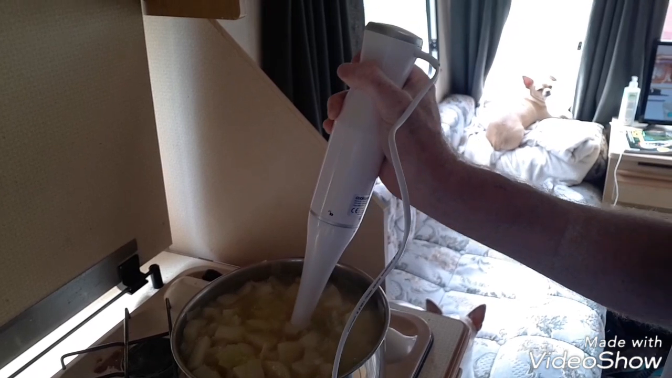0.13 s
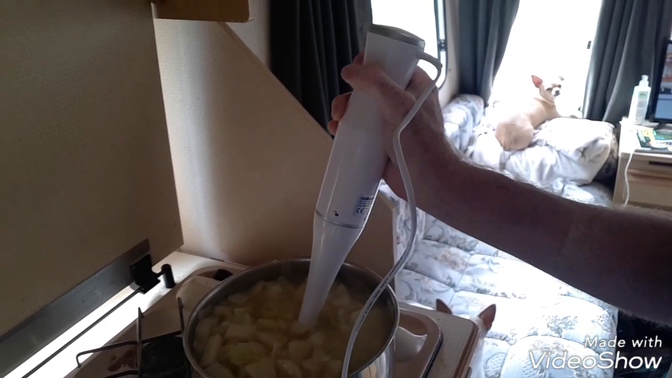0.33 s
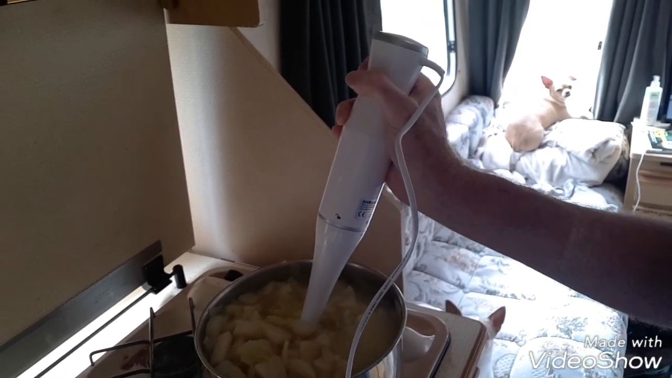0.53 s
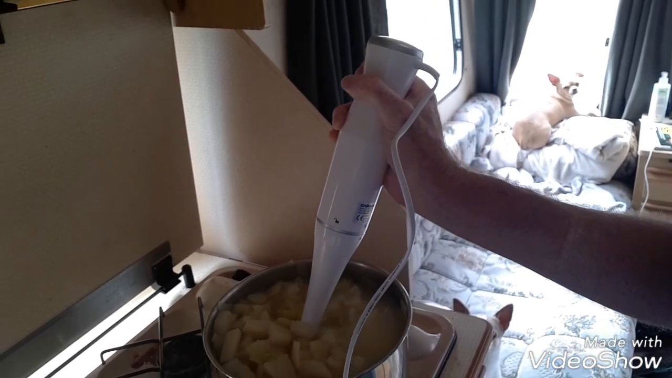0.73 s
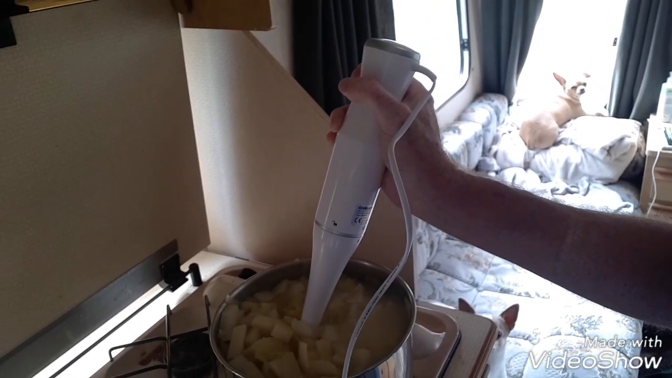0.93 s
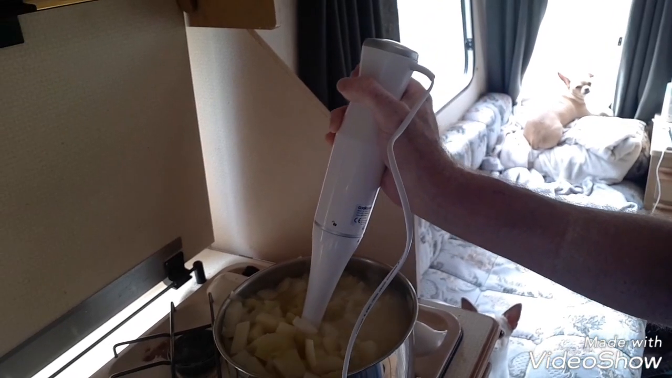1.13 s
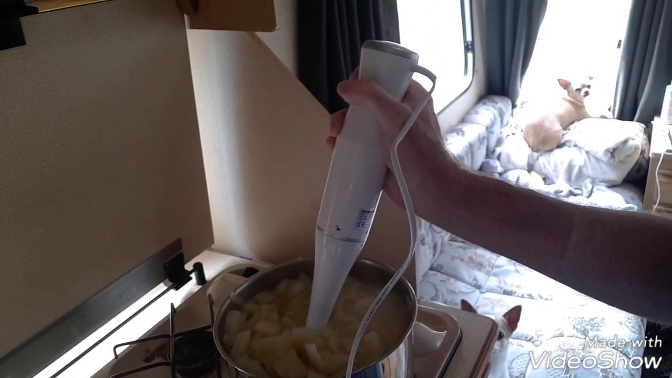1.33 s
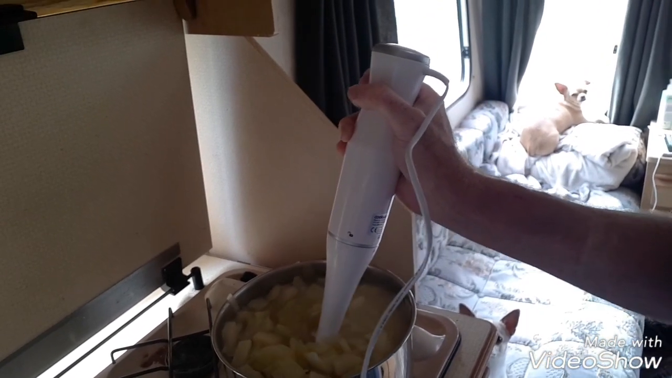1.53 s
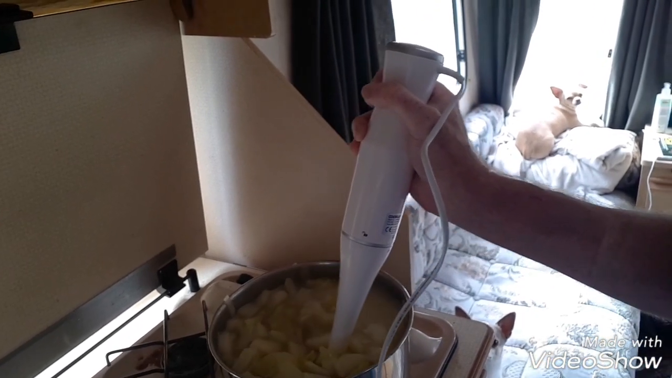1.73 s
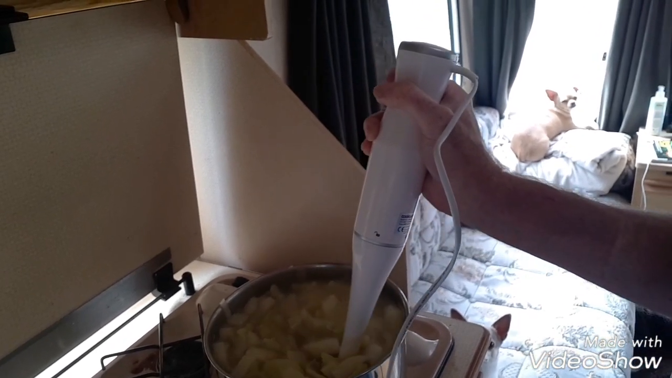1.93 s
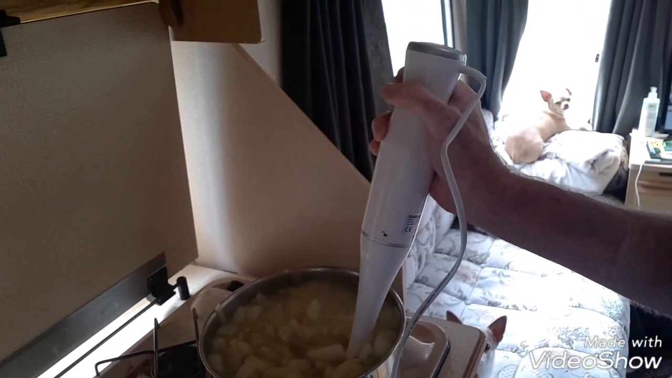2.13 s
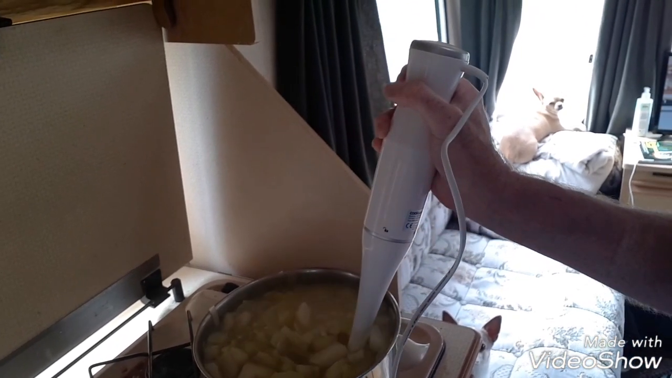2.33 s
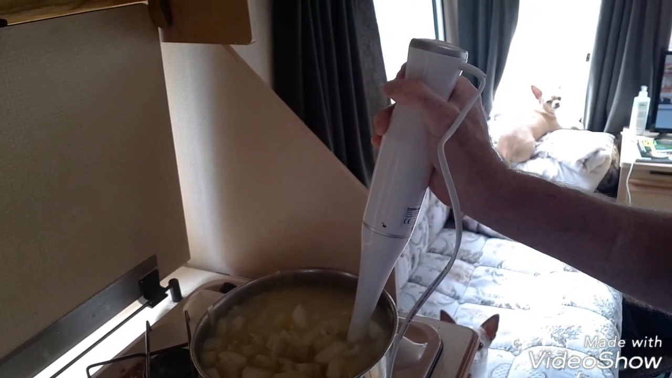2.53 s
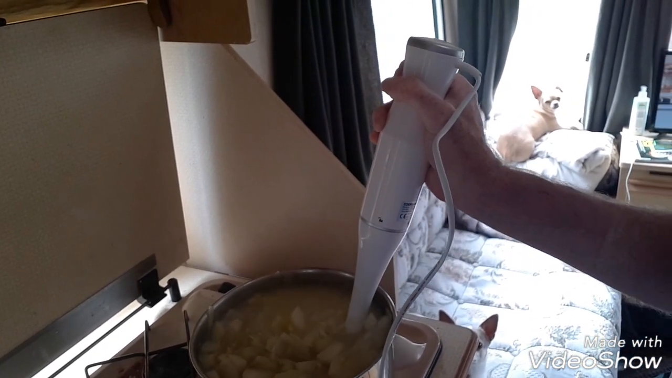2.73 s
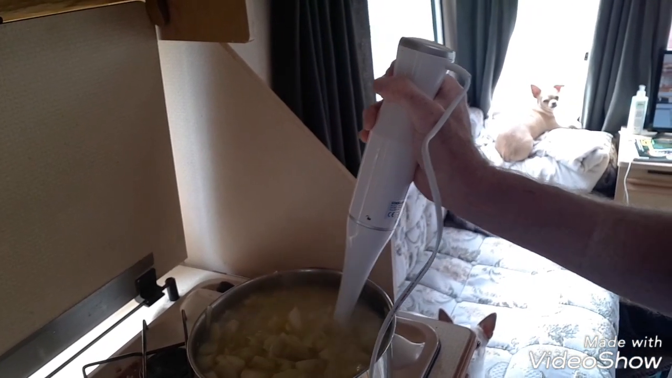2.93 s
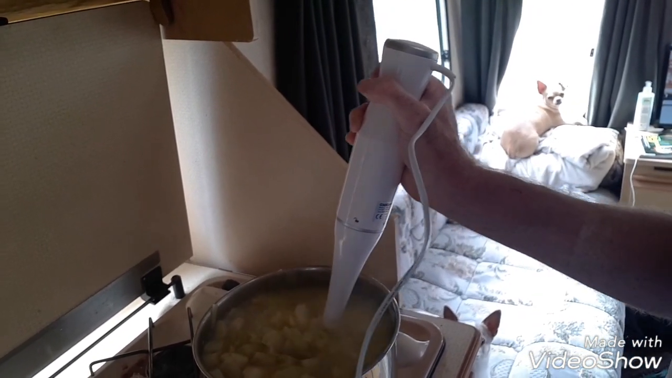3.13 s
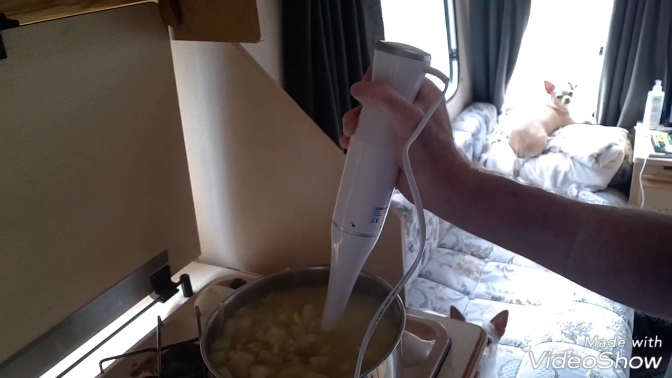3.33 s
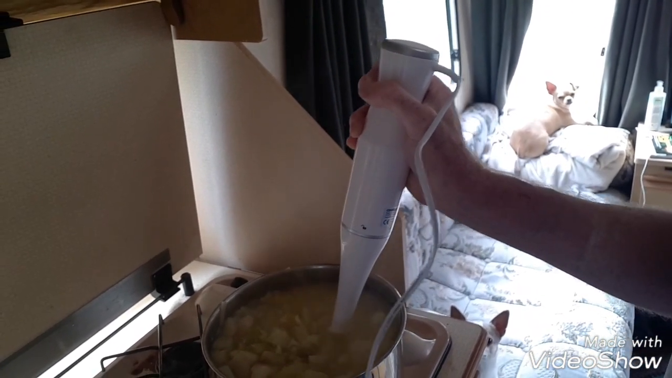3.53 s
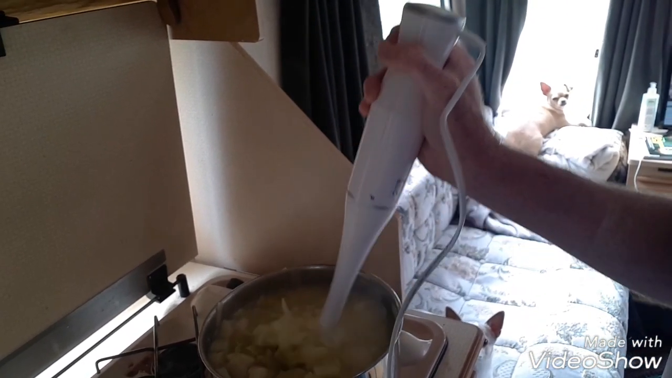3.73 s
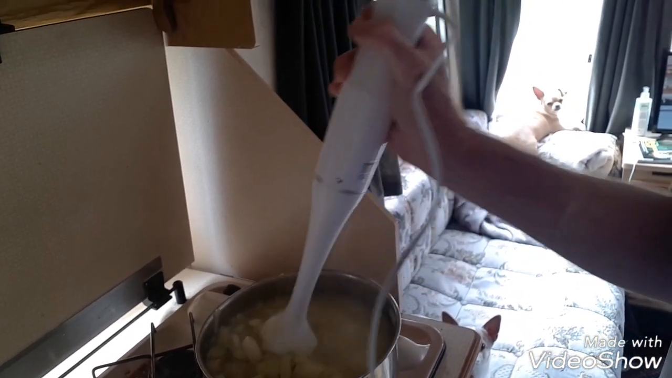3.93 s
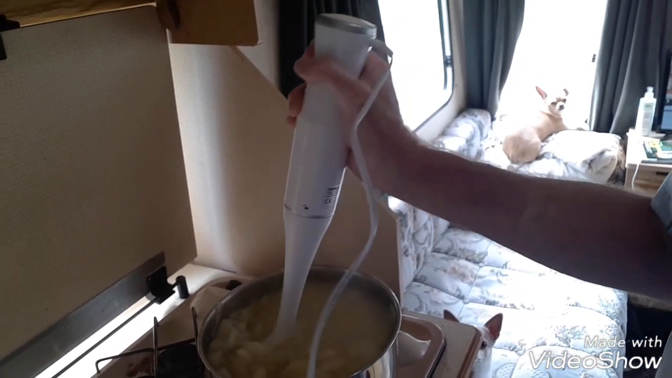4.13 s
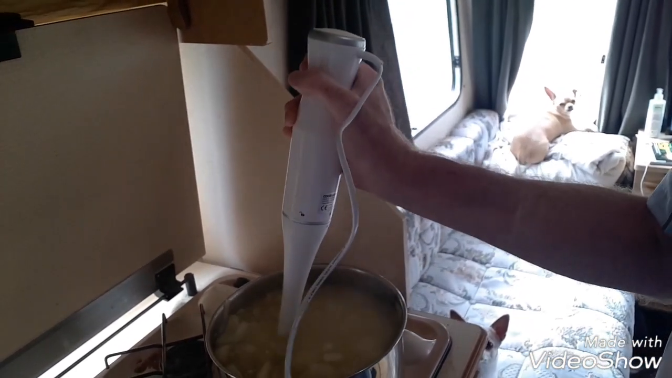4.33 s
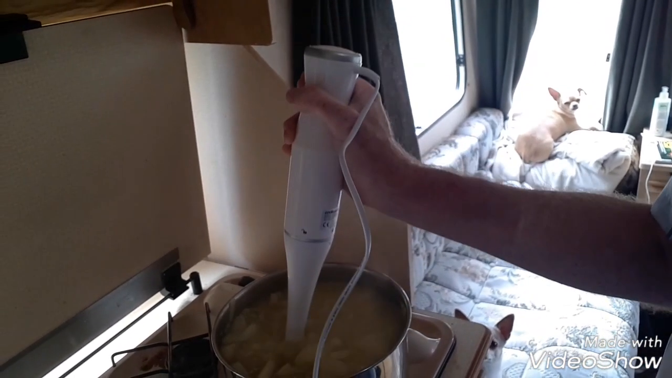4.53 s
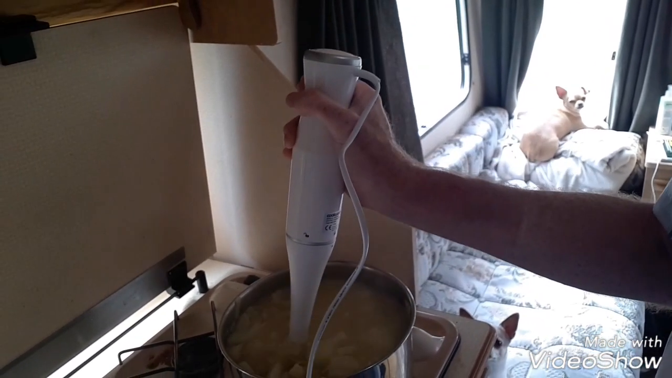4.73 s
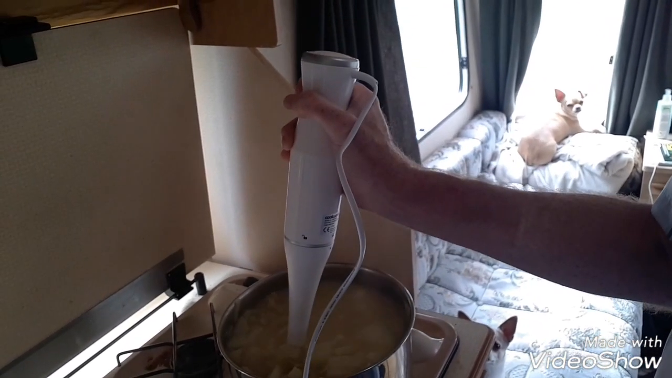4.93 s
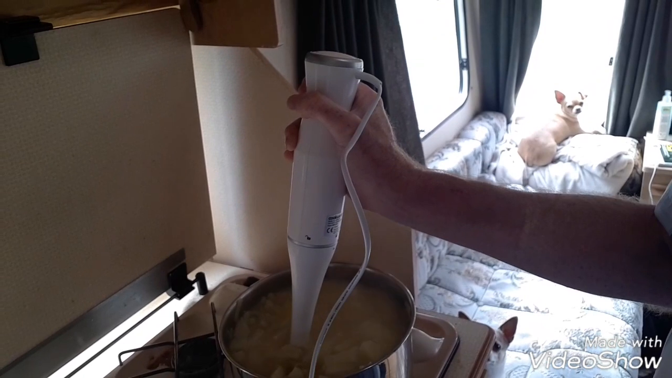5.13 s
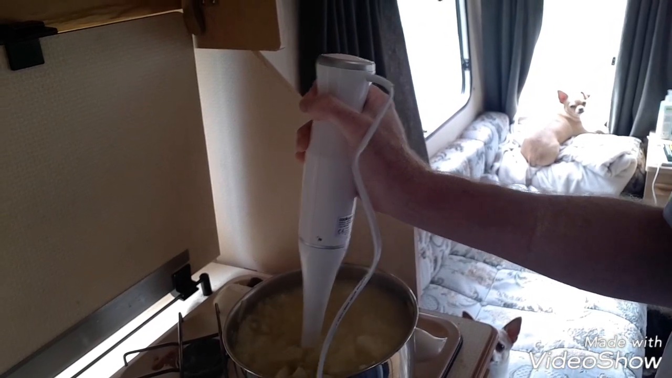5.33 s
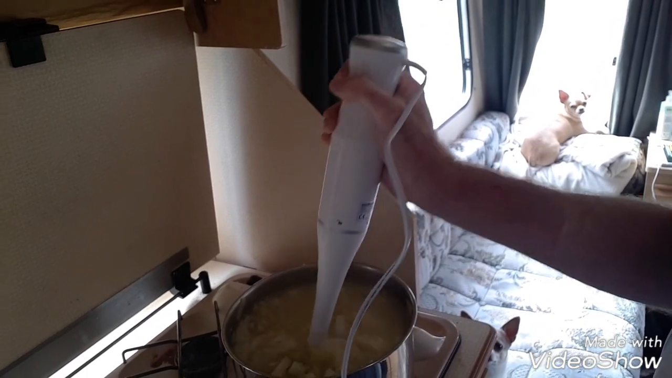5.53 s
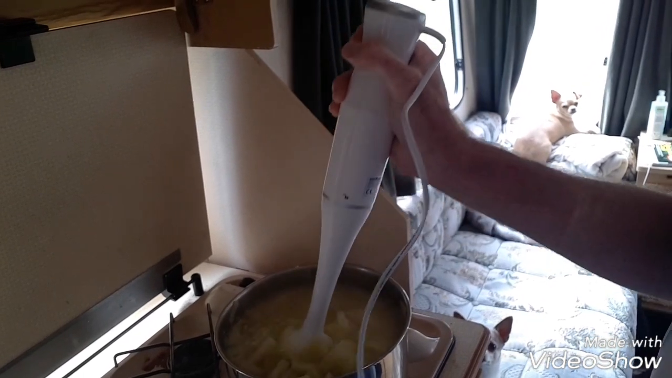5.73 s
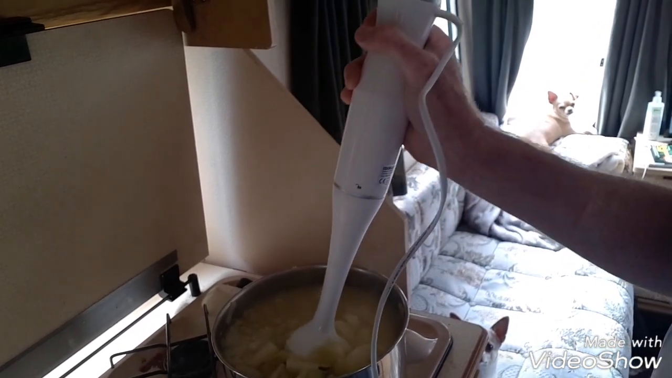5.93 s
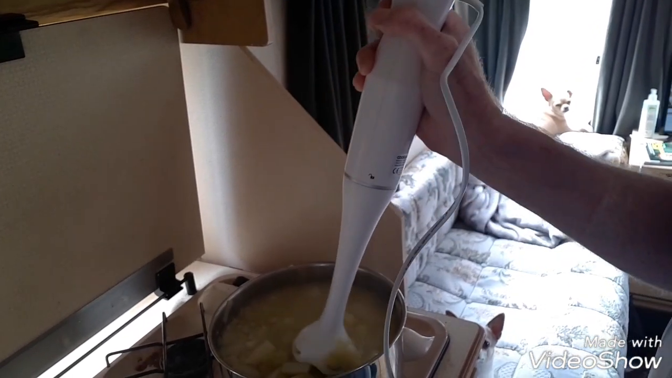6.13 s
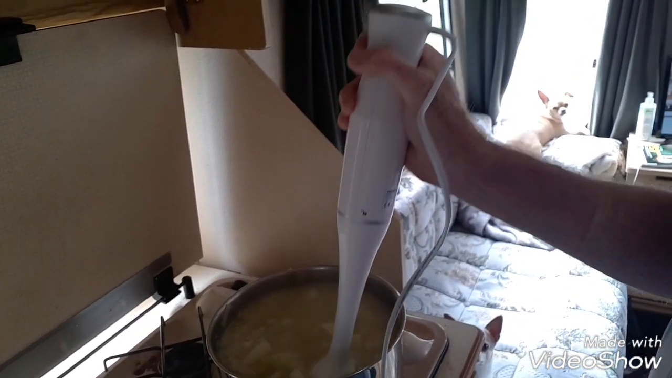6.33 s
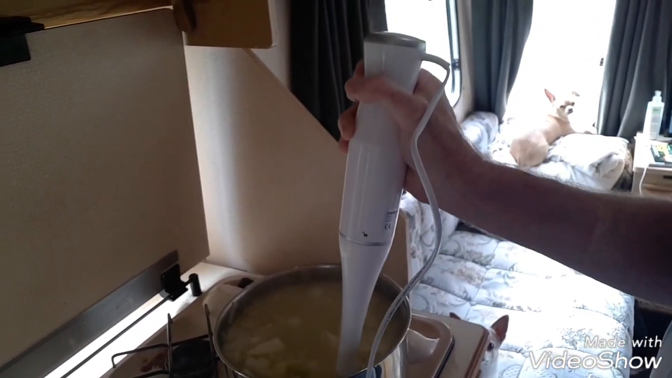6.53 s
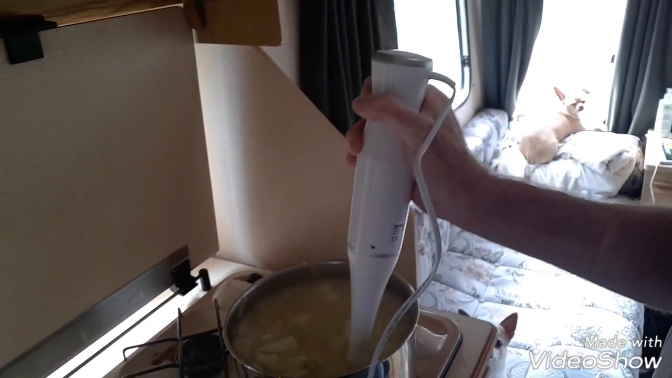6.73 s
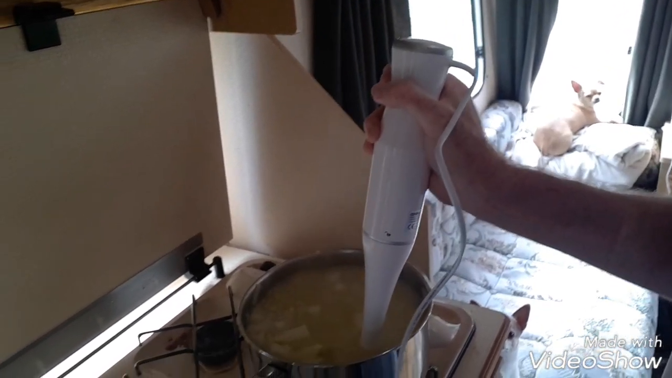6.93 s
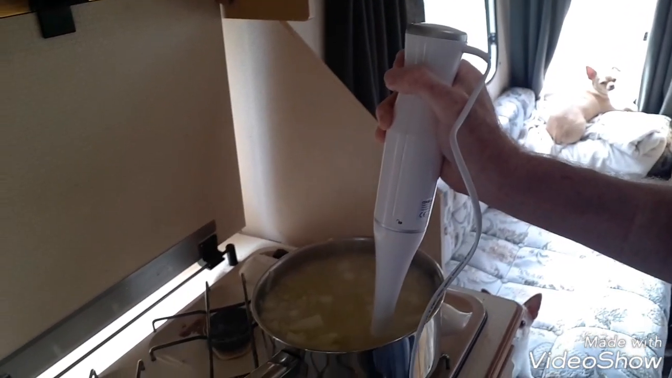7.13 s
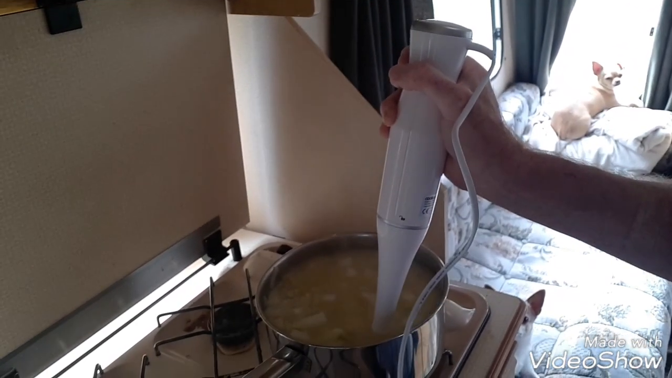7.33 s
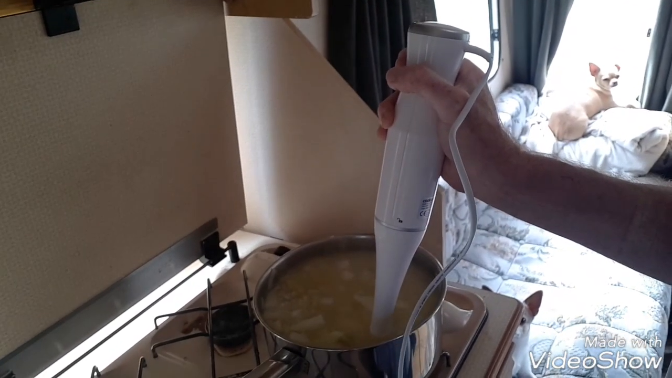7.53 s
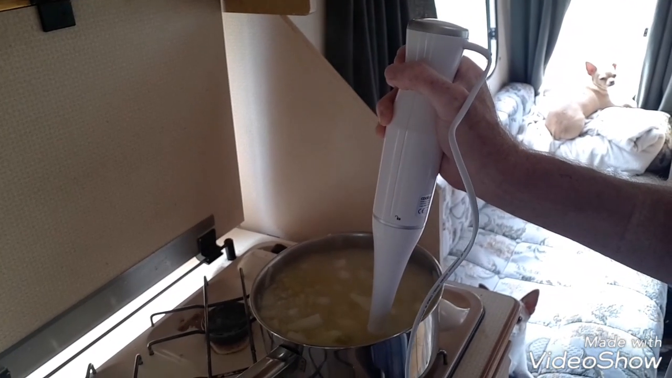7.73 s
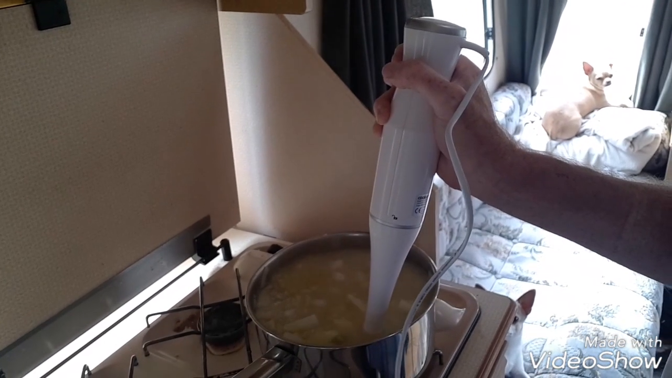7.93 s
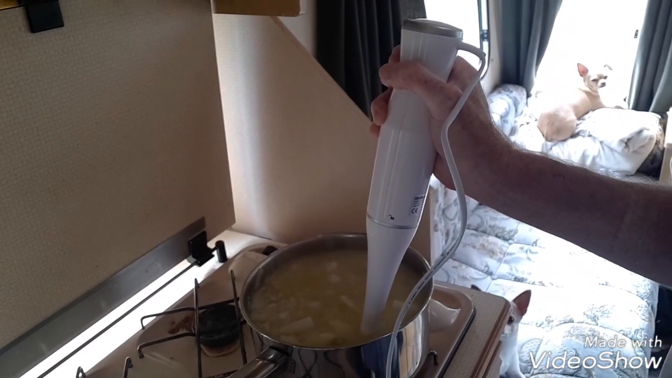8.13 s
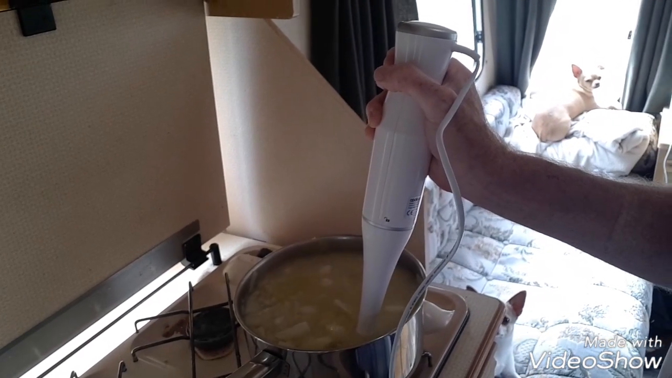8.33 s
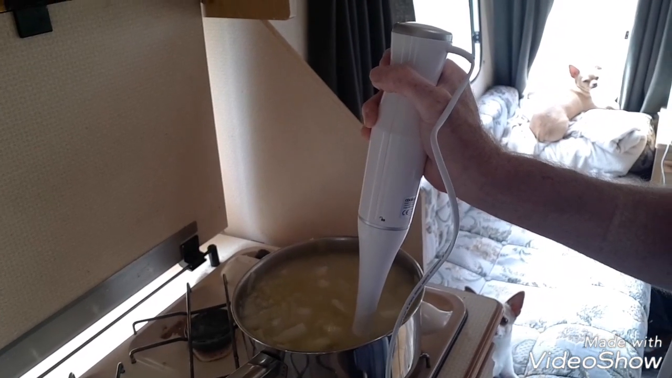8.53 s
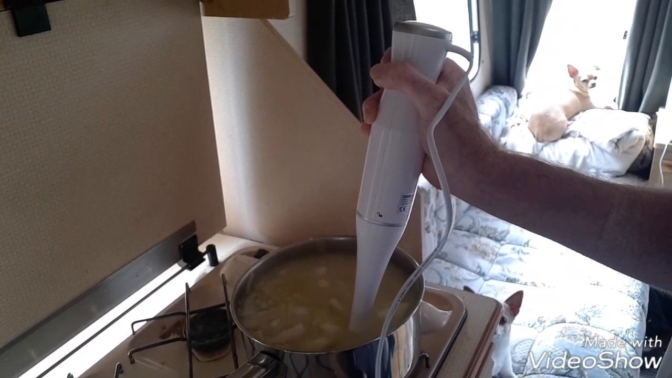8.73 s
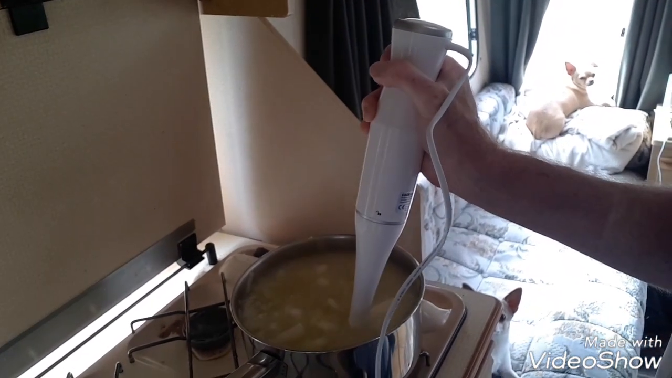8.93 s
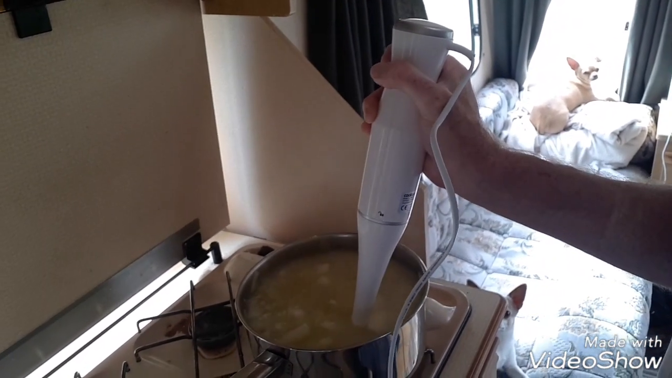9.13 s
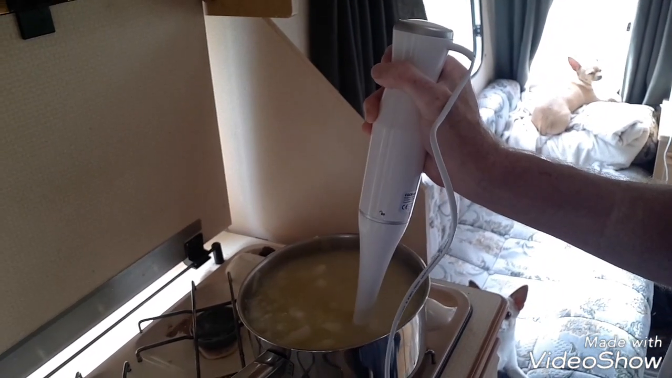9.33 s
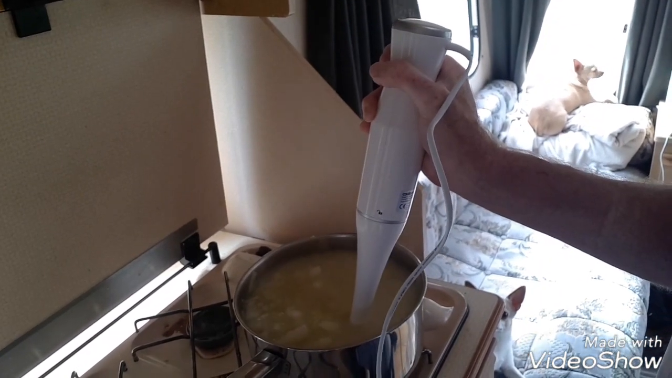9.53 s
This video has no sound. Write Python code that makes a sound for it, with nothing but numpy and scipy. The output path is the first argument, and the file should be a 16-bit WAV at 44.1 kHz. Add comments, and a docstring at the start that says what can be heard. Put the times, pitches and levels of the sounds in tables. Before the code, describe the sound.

Close electric hand blender starts, coasts down and restarts, its whine gliding over churning wet gurgles, crunching lumps and metallic shaft chatter.

```python
"""Stick blender in a soup pan

A cramped kitchen, hard walls close by, heard in stereo: front sound in both channels, side sound in opposition.
A stick blender purees soup in a steel pan, in short pulses and longer stretches: filtered grains of noise
gurgle, splash and rattle as the blade churns an air pocket and the shaft chatters in its housing.
The motor hums, its brushes hiss as filtered noise and its commutator whines as a train of ticks,
gliding up and down at each press of the switch."""
import sys
import numpy as np
from scipy import signal
from scipy.fft import rfft, irfft, next_fast_len
from scipy.io import wavfile
from scipy.ndimage import uniform_filter1d

SR = 44100
rng = np.random.default_rng(int(sys.argv[2]) if len(sys.argv) > 2 else 0)


def wrap_up_sound(samples):
    """Save the sound to the file named by the first command line argument, as 16-bit audio."""
    columns = np.atleast_2d(samples).T
    # keep every value between -1 and 1, then stretch to whole-number steps
    tamed = np.clip(columns, -1, 1)
    steps = np.round(tamed * 32767).astype(np.int16)
    wavfile.write(sys.argv[1], SR, steps)


N = 427329

FULL_SPEED = 200   # turns per s


def from_db(db):
    """Decibels to gain."""
    return 10 ** (np.asarray(db) / 20)


def rms_one(x):
    """Scale to unit power."""
    return x / np.sqrt(np.mean(x ** 2) + 1e-20)


def in_time(rows):
    """Each column of a curve at every sample."""
    s, *columns = np.transpose(rows)
    return [np.interp(np.arange(N) / SR, s, c) for c in columns]


def drift(rate):
    """Slow chance with spread 1: noise through a two-pole low-pass at rate Hz, drawn every 40 samples."""
    r = np.exp(-80 * np.pi * rate / SR)
    noise = rng.standard_normal(N // 40 + 2002)
    slow = signal.lfilter([1], [1, -2 * r, r * r], noise)[2000:]   # drop the filter's start
    return np.interp(np.arange(N) / 40, np.arange(len(slow)), rms_one(slow))


def colour(x, spectrum):
    """Give a signal the gains of a (pitch_hz, level_db) table."""
    size = next_fast_len(x.shape[-1])
    hz, db = np.transpose(spectrum)
    bins = np.maximum(np.arange(size // 2 + 1) * SR / size, 1)
    gains = from_db(np.interp(np.log(bins), np.log(hz), db))
    return irfft(rfft(x, size) * gains, size)[..., :x.shape[-1]]


def low_pass(x, order, hz):
    """Butterworth low-pass."""
    return signal.sosfilt(signal.butter(order, hz, fs=SR, output="sos"), x)


def resonate(x, modes):
    """Parallel resonances of (pitch_hz, width_hz, level_db), signs alternating."""
    out = 0
    for k, (hz, width, db) in enumerate(modes):
        r = np.exp(-np.pi * width / SR)
        poles = [1, -2 * r * np.cos(2 * np.pi * hz / SR), r * r]
        mode = (1 - r * r) / 2 * signal.lfilter([1, 0, -1], poles, x + 1e-18)
        out = out + (-1) ** k * from_db(db) * mode
    return out


def grains(per_s, spread_db):
    """Random tiny impacts of uneven size; two rows, as they arrive from the front and from the sides."""
    sizes = from_db(spread_db * np.minimum(rng.exponential(1, (2, N)), 4))
    hits = rng.random((2, N)) < per_s / SR
    return rms_one(hits * sizes * rng.choice([-1, 1], (2, N)))


def bursts(events, fade_s):
    """A quickly fading puff of noise at each (start_s, level_db) event."""
    kicks = np.zeros(N)
    for s, db in events:
        kicks[round(s * SR)] = from_db(db)
    fade = signal.lfilter([1], [1, -np.exp(-1 / (fade_s * SR))], kicks + 1e-18)
    return fade * rng.standard_normal(N)


def spells(rows, between_db, attack_s, release_s):
    """Level in dB of a steady sound with stronger spells, each an attack, a hold and a release."""
    t = np.arange(N) / SR
    power = from_db(2 * between_db)
    for start, length, db in rows:
        attack = np.clip((t - start) / attack_s, 0, 1)
        release = np.exp(-np.clip((t - start - length) / release_s, 0, 20))
        power = power + (from_db(db) * attack * release) ** 2
    return 10 * np.log10(power)


def wander(x, share, rate):
    """Let every pitch in a low two-row sound stray slowly by a share."""
    at = np.cumsum(1 + share * drift(rate)) % (N - 1)
    return np.array([np.interp(at, np.arange(N), row) for row in x])


# spectrum of the faint background: pitch_hz [Hz], level_db [dB per Hz]
ROOM_TONE = [(18, -35.5), (30, -23), (90, -2), (229, -22), (259, -11.5), (407, -24.5), (523, -15),
             (578, -18.5), (954, -16.5), (1320, -22.5), (5660, -37), (7840, -27.5), (9340, -44),
             (12000, -41.5), (15600, -71), (22000, -120)]
ROOM_TONE_DB = -71.5


def room_tone():
    """Faint coloured noise of the kitchen, partly shared by the two channels."""
    air = rng.standard_normal(N) + 0.79 * rng.standard_normal((2, N))
    return from_db(ROOM_TONE_DB) * rms_one(colour(air, ROOM_TONE))


KITCHEN_T60_S = .16


def reflections(x):
    """Close walls send back a short dense tail of the same power."""
    t = np.arange(SR // 4) / SR
    tail = rng.standard_normal(len(t)) * from_db(-60 * t / KITCHEN_T60_S) * (t > .002)
    return signal.fftconvolve(x, tail / np.linalg.norm(tail))[:N]


def back_wall(x):
    """The hard wall behind the pan throws back mainly treble."""
    treble = signal.butter(2, 1800, "high", fs=SR, output="sos")
    return from_db(-8.5) * signal.sosfilt(treble, reflections(x))


# soup slops round the guard while the motor rests: start_s [s], length_s [s], level_db [dB]
SLOSHES = [(4.229, .06, -70), (5.65, .65, -77), (6.305, .07, -64.5)]
# its colour: pitch_hz [Hz], level_db [dB per Hz]
SLOP = [(60, -20), (150, -8), (320, 0), (520, -9), (950, -8), (1500, -19), (3000, -29), (7000, -45)]


def sloshes():
    """Soft wet stirring as the guard is lifted and set down."""
    level = from_db(spells(SLOSHES, between_db=-90, attack_s=.006, release_s=.02))
    return level * rms_one(colour(grains(per_s=1500, spread_db=3), SLOP))


# a faint falling squeak as the blender is lifted: start_s [s], pitch_hz [Hz], level_db [dB]
SQUEAK = [(3.84, 2400, -100), (3.88, 2360, -88), (4.0, 2230, -87), (4.05, 2180, -78), (4.13, 2100, -100)]


def squeak():
    """One thin gliding tone."""
    hz, db = in_time(SQUEAK)
    t = np.arange(N) / SR
    sounding = (t > SQUEAK[0][0]) * (t < SQUEAK[-1][0])
    return np.sqrt(2) * from_db(db) * np.sin(2 * np.pi * np.cumsum(hz) / SR) * sounding


# ticks of the plastic handle: start_s [s], level_db [dB, before the ring]
HANDLE_TICKS = [(3.903, -59), (3.9574, -39), (3.997, -52), (4.135, -53), (4.229, -49)]
# ring of the handle: pitch_hz [Hz], width_hz [Hz], level_db [dB]
HANDLE_RING = [(1600, 700, -8), (2240, 110, -5), (2830, 220, 0), (3100, 110, -1), (3320, 140, 0),
               (3750, 600, 0)]
# the guard bumps the bottom of the pan: start_s [s], level_db [dB, before the ring]
BUMPS = [(4.229, -44), (6.306, -33)]
# dull ring of the full pan: pitch_hz [Hz], width_hz [Hz], level_db [dB]
PAN_RING = [(345, 27, 7), (511, 25, -1), (673, 30, -2), (910, 45, 2), (1500, 500, -17), (3000, 900, -28)]


def handling():
    """The plastic handle ticks in the grip as the blender is lifted; the guard bumps the bottom of the full pan."""
    ticks = low_pass(resonate(bursts(HANDLE_TICKS, fade_s=.007), HANDLE_RING), 2, 4500)
    return ticks + resonate(bursts(BUMPS, fade_s=.004), PAN_RING)


# ring of pan and shaft: pitch_hz [Hz], width_hz [Hz], level_db [dB]
STEEL = [(3133, 50, -3), (3355, 50, 2), (3930, 60, -2), (4166, 90, -3), (4650, 80, -3), (6115, 45, -1),
         (6233, 45, -3), (7212, 40, 1), (8465, 40, 2), (9800, 90, -5), (10730, 110, -2), (11100, 40, -4),
         (12890, 45, -2), (14500, 60, -10)]


def steel_ring(blows):
    """Blows set the narrow resonances of pan and shaft ringing."""
    return resonate(blows, STEEL)


# switch snaps, hard lumps, knocks of the guard: start_s [s], level_db [dB, before the ring], top_hz [Hz]
CLICKS = [(0.1334, -12, 16000), (0.158, -22, 12000), (0.2125, -15.5, 12000), (0.2705, -16, 12000),
          (0.6557, -36, 12000), (0.9488, -30, 12000), (1.7695, -28, 12000), (3.08, -39, 12000),
          (3.0995, -26, 12000), (4.2925, -36, 12000), (6.434, -30, 12000), (6.575, -28, 12000)]
# ring of the guard: pitch_hz [Hz], width_hz [Hz], level_db [dB]
GUARD = [(1200, 700, -10), (2750, 600, -3), (3500, 600, -2), (4900, 1200, -6), (7900, 2000, -6)]


def knocks():
    """Sharp snaps of switch, lumps and guard, bursts of noise that leave guard and steel ringing."""
    blows = 0
    for s, db, top_hz in CLICKS:
        blow = bursts([(s, db)], fade_s=.005) + from_db(-11) * bursts([(s, db)], fade_s=.022)
        blows = blows + low_pass(blow, 2, min(top_hz, SR / 2 - 1))
    return from_db(-1.5) * resonate(blows, GUARD) + from_db(3) * steel_ring(blows)


# gulps of soup: start_s [s], level_db [dB, before the resonances]
GULPS = [(0.105, -23), (1.064, -19), (1.82, -16), (2.225, -18), (3.125, -17), (3.385, -19), (3.488, -18),
         (5.218, -20), (6.513, -20), (6.605, -19), (6.668, -19), (7.879, -16), (8.39, -20), (9.005, -18),
         (9.205, -18)]


def gulps():
    """Dull gulps of soup, fading noise through three low resonances."""
    hollow = resonate(bursts(GULPS, fade_s=0.038), [(129, 60, -5), (320, 66, 2.5), (805, 400, -3.5)])
    return from_db(3) * low_pass(hollow, 2, 1400)


# lumps crushed between blade and guard: start_s [s], length_s [s], level_db [dB, crackle alone]
CRUNCHES = [(.134, .04, -37), (.205, .07, -37), (1.41, .04, -43), (1.805, .035, -35), (2.07, .25, -42),
            (4.229, .06, -68), (4.788, .03, -39), (4.915, .02, -42), (5.083, .1, -42), (7.86, .045, -35),
            (8.915, .02, -42), (9.372, .025, -37)]
# their crackle: pitch_hz [Hz], level_db [dB per Hz]
CRACKLE = [(200, -14), (450, 2), (800, 7), (1500, 4), (2800, -2), (4000, -1), (5500, -1), (8000, -5),
           (12000, -20)]


def crunches():
    """Hard bits crackle against the guard and set the steel ringing."""
    bits = grains(per_s=1400, spread_db=2.2)
    crackle = rms_one(colour(bits, CRACKLE)) + from_db(-14) * rms_one(steel_ring(bits))
    return from_db(spells(CRUNCHES, between_db=-90, attack_s=.008, release_s=.018)) * crackle


# the shaft is pushed sideways and chatters: start_s [s], length_s [s], level_db [dB, at full speed share]
CHATTERS = [(.08, .05, -41.5), (.132, .15, -35), (.665, .05, -39), (.89, .22, -42), (2.06, .26, -41),
            (2.54, .41, -37), (3.085, .06, -41), (4.292, .25, -36.5), (4.78, .07, -39), (5.08, .3, -43),
            (6.438, .26, -41), (9.21, .22, -43)]
CHATTER_DB, COAST_CHATTER_DB = -46.2, -46.5   # between spells: driven, and when the drive lets go
RATTLE_FALL_DB = 6.8   # lost when the shaft speed halves
SETTLE_SHARE = .06   # below this share of full speed the shaft settles in its bearing and chatter dies away


def rattle_level(share, octaves, driven):
    """Level in dB of the chatter: spells over a steady rattle that sinks as the shaft slows."""
    loose_db = driven * CHATTER_DB + (1 - driven) * COAST_CHATTER_DB
    settling_db = 20 * np.log10(share / (share + SETTLE_SHARE))
    spells_db = spells(CHATTERS, loose_db, attack_s=.025, release_s=.035)
    return spells_db + RATTLE_FALL_DB * octaves + settling_db + 2.1 * drift(9)


# spectrum of the chatter: pitch_hz [Hz], level_db [dB per Hz]
RATTLE = [(1290, -27), (2200, -20), (2980, -16), (3260, -4.5), (3530, 1), (4060, -1), (4900, 0), (5490, -3),
          (6630, -2), (7740, 1), (8900, -5), (10600, -6), (11500, 0), (12900, -6), (13900, -7),
          (14900, -22), (15500, -34)]


def shaft_rattle(turns, rattle_db):
    """The shaft chatters once a turn and sets the steel ringing; harder contact is brighter and rings more."""
    contact = from_db(2.2 * np.cos(2 * np.pi * turns) + 2.2 * drift(70))
    chatter = grains(per_s=6000, spread_db=2.5) * contact
    body, ringing = rms_one(colour(chatter, RATTLE)), rms_one(steel_ring(chatter))
    sizzle = rms_one(resonate(chatter, [(8190, 340, -2.2), (10100, 900, 1), (13000, 1700, -1)]))
    hardness = np.clip((rattle_db + 42) / 7, 0, 1)
    ring_gain = from_db(-14.5 + 10 * hardness)
    mix = from_db(-3.5) * body + ring_gain * ringing + from_db(-11) * hardness * sizzle
    return from_db(rattle_db) * mix


# resonances of the churned air: pitch_hz [Hz], width_hz [Hz], level_db [dB]
AIR_POCKET = [(282.7, 33, -4.5), (338.5, 25, -0.5), (370.2, 31, -1)]
POCKET_WANDER = .05   # the pocket grows and shrinks: share of its pitch


def air_pocket():
    """The blade pumps a gurgling pocket of air, grains through low resonances; unit power or near it."""
    pocket = wander(resonate(grains(per_s=1700, spread_db=1.0), AIR_POCKET), POCKET_WANDER, rate=4)
    band = signal.butter(2, [235, 440], "band", fs=SR, output="sos")
    pocket = rms_one(signal.sosfilt(band, pocket))
    # the blade feeds the pocket steadily, so its strength evens out over a dozen turns
    return pocket / np.sqrt(uniform_filter1d(pocket ** 2, size=3000) + 1e-6)


# the whole panful surges: start_s [s], length_s [s], level_db [dB, before a fixed gain in soup()]
SURGES = [(.12, .15, -49), (.7, .1, -47), (1.32, .05, -40), (1.68, .2, -42.5), (2.06, .28, -43),
          (2.47, .18, -43.5), (2.76, .22, -50), (3.34, .2, -48), (4.31, .2, -48), (5.06, .06, -45),
          (6.7, .08, -45), (7.34, .07, -44), (7.65, .06, -48), (7.87, 1.5, -44.5)]
SURGE_FALL_DB = 5.5   # lost when the shaft speed halves


def surge_level(octaves):
    """Level in dB of the swirling panful: swells that sink as the shaft slows."""
    swells_db = spells(SURGES, between_db=-53, attack_s=.02, release_s=.035)
    return swells_db + SURGE_FALL_DB * octaves + 2.5 * drift(7)


# spectrum of the surging panful: pitch_hz [Hz], level_db [dB per Hz]
SWIRL = [(25, -33.5), (45, -24.5), (70, -12), (98, 4), (135, -4.5), (180, 2.5), (230, -3.5), (400, -5),
         (900, -45)]


def swirl():
    """The panful swirls: deep coloured grains of unit power."""
    return rms_one(colour(grains(per_s=900, spread_db=3.5), SWIRL))


SPLASH_CLUMP_DB = 2.1   # swing of each register; the top one swings less


def clumps(x, edges_hz=(650, 1100, 1800)):
    """Each register swells and sinks on its own as gobs of soup fly off."""
    out = 0
    for hz in edges_hz:
        low = signal.sosfiltfilt(signal.butter(3, hz, fs=SR, output="sos"), x)
        out = out + low * from_db(SPLASH_CLUMP_DB * drift(22))
        x = x - low
    return rms_one(out + x * from_db(.6 * SPLASH_CLUMP_DB * drift(22)))


BUBBLES_PER_S, BUBBLE_CYCLES = 170, 5


def bubbles(count=14):
    """Bubbles burst at random, each ringing a few cycles at one of several pitches."""
    pops, dealt = grains(BUBBLES_PER_S, spread_db=2.5), rng.integers(0, count, N)
    out = 0
    for k, hz in enumerate(np.geomspace(520, 2300, count)):
        ring = [(hz, hz / (np.pi * BUBBLE_CYCLES), 0)]
        out = out + resonate(pops * (dealt == k), ring) / hz ** .7
    return rms_one(out)


BUZZ_FLUTTER_DB = 4.5   # swing of each overtone


def blade_buzz(turns, count=11):
    """The blade slaps the soup on every turn; each overtone of that buzz comes and goes in short strands."""
    out = 0
    for k in range(3, count + 1):
        strand = np.sin(2 * np.pi * k * turns + 1.5 * drift(9))
        out = out + from_db(BUZZ_FLUTTER_DB * drift(14)) * strand / max(k, 5)
    return rms_one(out)


# spectrum of the flung drops: pitch_hz [Hz], level_db [dB per Hz]
SOUP = [(250, -32.5), (430, -10.5), (442, 0.5), (591, 0), (636, -2), (753, -2.5), (796, 0), (890, 3.5),
        (1060, -3), (1650, -4), (2180, -11), (2560, -11), (2970, -16.5), (3260, -32), (4000, -22.5),
        (5200, -46), (8800, -120)]
BUBBLE_DB, BUZZ_DB = -7.5, -8.5   # against the splash


def splashing(turns):
    """The blade flings drops as it turns: grains pulsing once a turn, with bubbles and buzz."""
    drops = grains(per_s=6000, spread_db=1.0) * (1 + .2 * np.cos(2 * np.pi * turns))
    splash = clumps(colour(drops, SOUP)) + from_db(BUBBLE_DB) * bubbles()
    buzz = np.array([blade_buzz(turns), blade_buzz(turns)])
    return splash * from_db(1.3 * drift(30)) + from_db(BUZZ_DB) * buzz


def soup(turns, churn_db, splash_db, surge_db):
    """The blade pumps an air pocket, flings drops and swirls the panful."""
    churned = from_db(churn_db + 0.74) * air_pocket()
    return churned + from_db(splash_db - 0.15) * splashing(turns) + from_db(surge_db + 2.5) * swirl()


# work of the blade once up to speed, before trims: start_s [s], churn_db [dB], hum_db [dB], splash_db [dB]
WORK = [(0.05, -40, -46, -41), (0.12, -35.5, -44.0, -32.0), (0.3, -37.0, -39.5, -31.5),
        (0.5, -36, -38, -35), (0.75, -38.0, -31.0, -34.0), (0.88, -36.5, -32.5, -37.0),
        (1.14, -38.5, -30.5, -35.5), (1.3, -39.0, -34.0, -35.0), (1.6, -36.5, -32.5, -34.5),
        (2.0, -35.5, -33.5, -33.0), (2.25, -32.5, -31.5, -33.5), (2.8, -34.5, -28.5, -33.0),
        (2.92, -31.0, -29.5, -33.0), (3.15, -32.5, -30.0, -32.0), (3.43, -31.5, -32.0, -31.3),
        (3.62, -31, -33, -37), (4.31, -41.0, -34.0, -33.0), (4.37, -37.0, -22.5, -31.5),
        (4.48, -36.0, -26.0, -31.5), (4.62, -35.0, -32.0, -32.5), (4.75, -34.0, -32.5, -33.0),
        (4.95, -36.0, -32.5, -34.0), (5.1, -36.0, -32.5, -33.0), (5.26, -35.0, -35.5, -32.0),
        (6.53, -37.5, -34.5, -36.0), (6.66, -35.5, -35.0, -34.5), (6.95, -39.0, -41.0, -35.0),
        (7.2, -40.0, -44.5, -35.0), (7.45, -39.0, -35.5, -35.0), (7.8, -40.0, -32.5, -34.0),
        (8.0, -36.0, -34.5, -33.5), (8.6, -36.5, -33.0, -33.5), (8.88, -36.5, -34.5, -33.0),
        (9.05, -32.5, -34.0, -32.5), (9.45, -35.0, -34.0, -34.0), (9.69, -34.5, -32.5, -33.5)]
CHURN_TRIM_DB, HUM_TRIM_DB, SPLASH_TRIM_DB = 1.5, 1.7, -1
CHURN_FLUTTER_DB, HUM_FLUTTER_DB, LUMPS_PER_S = 1.6, 1.3, 11   # passing lumps make churning and hum waver
CHURN_FALL_DB, SPLASH_FALL_DB = 11.5, 13   # lost when the shaft speed halves, the splash's while coasting
DRIVEN_FALL = .65   # under power the blade bites hard even while slow: share of the splash loss that remains
# the churning swells as the coasting blade sweeps through the air pocket's resonance
POCKET_HZ, POCKET_WIDTH_HZ, POCKET_BOOST_DB = 325, 60, 6.5


def blade_work(speed, octaves, driven):
    """Levels in dB of churning, hum and splash: load sets them, lumps shake churn and hum, slowing sinks churn and splash."""
    churn_db, hum_db, splash_db = in_time(WORK)
    in_tune = (1 - driven) * np.exp(-((2 * speed - POCKET_HZ) / POCKET_WIDTH_HZ) ** 2)
    churn_db = churn_db + CHURN_TRIM_DB + CHURN_FALL_DB * octaves + POCKET_BOOST_DB * in_tune
    churn_db = churn_db + CHURN_FLUTTER_DB * drift(LUMPS_PER_S)
    hum_db = hum_db + HUM_TRIM_DB + HUM_FLUTTER_DB * drift(LUMPS_PER_S)
    splash_fall = SPLASH_FALL_DB * octaves * (1 - driven * (1 - DRIVEN_FALL))
    return churn_db, hum_db, splash_db + SPLASH_TRIM_DB + splash_fall


def pocket_tuning(speed):
    """Share of churning power that is a clean tone while the blade rate sweeps the air pocket's resonances."""
    return np.interp(speed, [90, 130, 165, 180], [0, .3, .45, 0])


def blade_hum(turns, hum_db):
    """Two blade edges hum at twice the shaft speed, fluttering in level and phase."""
    level = from_db(hum_db - 1.5 + 0.5 * drift(6.2))
    return np.sqrt(2) * level * np.sin(4 * np.pi * turns + 0.087 * drift(14))


# resonances of the motor housing: pitch_hz [Hz], width_hz [Hz], level_db [dB]
HOUSING = [(2540, 300, 5), (3500, 360, -2.5), (4800, 420, 6), (7180, 150, 4), (7650, 550, 6.5),
           (9750, 300, -2), (11600, 580, -10.5), (14400, 700, -17)]
MAINS_HZ = 50


def brush_hiss(speed):
    """The brushes spark with each half wave of the mains and hiss through flickering housing resonances."""
    half_waves = 1 + .16 * np.cos(4 * np.pi * MAINS_HZ * np.arange(N) / SR)
    sparks = rng.standard_normal((2, N)) * half_waves
    hiss = 0
    for k, mode in enumerate(HOUSING):
        hiss = hiss + (-1) ** k * resonate(sparks, [mode]) * from_db(1.8 * drift(12))
    return from_db(-45.5) * (speed / FULL_SPEED) ** 2 * rms_one(hiss)


# the shaft runs off centre: start_s [s], length_s [s], level_db [dB, at full speed]
THRUMS = [(.14, .13, -43), (4.38, .1, -42), (5.14, .14, -42), (6.8, .45, -45), (8.85, .13, -40),
          (9.5, .14, -40)]


def thrum(turns):
    """The off-centre shaft shakes the pan once a turn."""
    db = spells(THRUMS, between_db=-52, attack_s=.04, release_s=.03) + 1.5 * drift(12)
    return np.sqrt(2) * from_db(db) * np.sin(2 * np.pi * turns)


# spells in which the rotor sings: start_s [s], length_s [s], level_db [dB, at full speed]
SONGS = [(6.8, .55, -51), (8.0, .3, -54), (9.45, .22, -55)]
SONG_ORDER = 13   # multiple of the shaft speed


def rotor_song(turns):
    """One rough overtone of the rotor sings out in spells."""
    db = spells(SONGS, between_db=-62, attack_s=.04, release_s=.04) + 3 * drift(20)
    return np.sqrt(2) * from_db(db) * np.sin(2 * np.pi * SONG_ORDER * turns + .8 * drift(20))


# rotor drones: order [multiple of shaft speed], level_db [dB, at full speed], extra_db [dB, spinning freely]
ORDERS_DB = [(3, -59.5, 1.5), (4, -49.5, 8), (8, -56, 2), (12, -61, 11)]
# where free spinning begins and is complete: speed [turns per s]
FREE_SPEED = (197, 206)


def rotor_drone(turns, speed):
    """Fluttering multiples of the shaft speed, clearest when the blade spins freely."""
    free = np.interp(speed, FREE_SPEED, [0, 1])
    out = 0
    for order, db, extra_db in ORDERS_DB:
        level = from_db(db + free * extra_db + 2.5 * drift(20))
        out = out + level * np.sin(2 * np.pi * round(order) * turns)
    return np.sqrt(2) * out


# the bars tick hardest at middle speeds: speed [turns per s], level_db [dB]
TICK_DB = [(1, -28), (15, -12), (40, -1), (100, 4.5), (165, 5), (195, 0)]
COMMUTATOR_BARS = 24
BAR_SCATTER = .023   # the brushes bounce, so each tick is early or late: share of a bar


def bar_ticks(turns, speed):
    """One tick per commutator bar, a little off time through play in the shaft; unit-power overtones at full speed."""
    play = speed / FULL_SPEED * (.0026 * drift(130) + .003 * np.sin(2 * np.pi * turns))
    bars = np.maximum.accumulate(COMMUTATOR_BARS * (turns + play))
    passed = np.arange(1, int(bars[-1]))
    early, strength_db = rng.standard_normal((2, N))[:, passed]
    moments = np.interp(passed + BAR_SCATTER * early, bars, np.arange(N)).clip(0, N - 2)
    at, late = np.divmod(moments, 1)
    at = at.astype(int)
    strength = from_db(np.interp(speed[at], *np.transpose(TICK_DB)) + 1.3 * strength_db)
    # share each tick between the two nearest samples
    ticks = np.bincount(at, strength * (1 - late), N) + np.bincount(at + 1, strength * late, N)
    return ticks * SR / (np.sqrt(2) * COMMUTATOR_BARS * FULL_SPEED)


# how the housing passes the ticks: pitch_hz [Hz], level_db [dB]
SHELL = [(300, -70), (1500, -30), (2700, -10), (3300, -20), (4000, -4), (4400, -9), (4750, -5), (5400, -15),
         (6200, -6), (7000, -5), (8000, 2), (8800, -1), (9400, 2.5), (9900, 5), (10400, -12), (11500, -4),
         (12700, -12), (13700, -2), (14250, -13), (14800, -7), (16000, -36)]
WHINE_DB = -50.3   # level of the ticks before the housing


def commutator_whine(turns, speed):
    """Overtones of the commutator ticks flicker and glide through the housing's resonances."""
    whine = from_db(WHINE_DB + 3 * drift(24)) * colour(bar_ticks(turns, speed), SHELL)
    return .8 * whine + .6 * reflections(whine)   # the walls make its glides uneven


def motor_whine(turns, speed):
    """The rotor drones, thrums and sings, stronger with speed, under the commutator's whine."""
    rotor = rotor_drone(turns, speed) + thrum(turns) + rotor_song(turns)
    return (speed / FULL_SPEED) ** 4 * rotor + commutator_whine(turns, speed)


# presses of the switch: on_s [s], off_s [s]
PRESSES = [(-.5, -.06), (.076, .292), (.655, .877), (1.031, 2.912), (3.079, 3.437), (4.293, 5.268),
           (6.432, 9.8)]
SPIN_UP_S, COAST_S = .029, .175   # time constants of the motor, switched on and off
FRICTION = .11   # dry friction that brings the coasting shaft to rest, against the drag at full speed
GRIP_S = .015   # time in which the drive takes up or lets go of the shaft


def motor():
    """Share of full speed and grip of the drive (0-1): a press spins the shaft up, a release lets it coast to rest."""
    t = np.arange(N) / SR
    share, driven, at_press = np.zeros(N), np.zeros(N), 0
    for k, (on, off) in enumerate(PRESSES):
        rise = 1 - (1 - at_press) * np.exp(-np.clip(t - on, 0, off - on) / SPIN_UP_S)
        coast = np.exp(-np.maximum(t - off, 0) / COAST_S)
        run = np.maximum((rise + FRICTION) * coast - FRICTION, 0)
        share = np.where(t >= on, run, share)
        driven[(t >= on) & (t < off)] = 1
        if k + 1 < len(PRESSES):
            at_press = np.interp(PRESSES[k + 1][0], t, share)
    lag = np.exp(-1 / (GRIP_S * SR))
    grip = signal.lfilter([1 - lag], [1, -lag], driven + 1e-18)
    return np.maximum(share, 1e-4), grip


# speed that the load allows: start_s [s], speed [turns per s]
LOADED_SPEED = [(.3, 175), (.7, 196), (.88, 199), (1.2, 202), (1.68, 203), (1.8, 195), (2.25, 201),
                (2.7, 191), (2.85, 197), (3.15, 195), (3.35, 199), (4.3, 186), (4.58, 185), (4.7, 198),
                (4.87, 192), (5.25, 201), (6.72, 192), (6.9, 200), (7.33, 200), (7.65, 206), (7.82, 205.5),
                (7.92, 199), (8.7, 202), (9.3, 196), (9.69, 198)]
# reflections from the sides: pitch_hz [Hz], level_db [dB against the direct sound]
SIDEWAYS = [(60, -8), (110, -7), (200, -11.5), (380, -10), (700, -4.5), (1290, -3.5), (2380, 1), (4400, 1),
            (8120, 0.5), (15000, 0.5)]


def scene():
    """The blender in its room, over a faint background."""
    share, driven = motor()
    speed, octaves = share * in_time(LOADED_SPEED)[0], np.log2(share)
    turns = np.cumsum(speed * (1 + .0025 * drift(9))) / SR
    churn_db, hum_db, splash_db = blade_work(speed, octaves, driven)
    tuned = pocket_tuning(speed)
    # a slow blade barely radiates, unless it meets the pocket's resonance
    hum_power = from_db(2 * hum_db) * np.minimum(speed / 180, 1) ** 8 + tuned * from_db(2 * churn_db)
    gurgle_db = churn_db + 10 * np.log10(1 - tuned)

    # wide sounds reach front and sides by separate grains
    wide = sloshes() + crunches() + shaft_rattle(turns, rattle_level(share, octaves, driven))
    wide = wide + soup(turns, gurgle_db, splash_db, surge_level(octaves)) + brush_hiss(speed)
    # direct sounds come from the front and reach the sides by the walls
    direct = squeak() + handling() + knocks() + gulps()
    direct = direct + blade_hum(turns, 10 * np.log10(hum_power + 1e-20)) + motor_whine(turns, speed)

    front = wide[0] + direct
    side = colour(wide[1] + reflections(direct), SIDEWAYS)
    front = front + back_wall(front)
    return front + side * [[1], [-1]] + room_tone()


CUTOFF_HZ = 15200


def record(dry):
    """The top is cut steeply."""
    return signal.sosfilt(signal.ellip(10, .2, 80, CUTOFF_HZ, fs=SR, output="sos"), dry)


dry = scene()
out = record(dry)
wrap_up_sound(out)
```